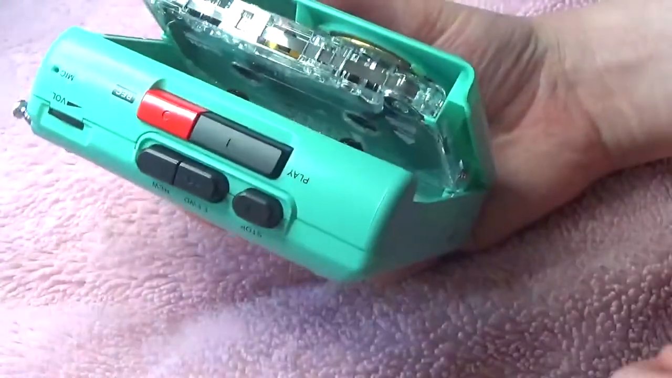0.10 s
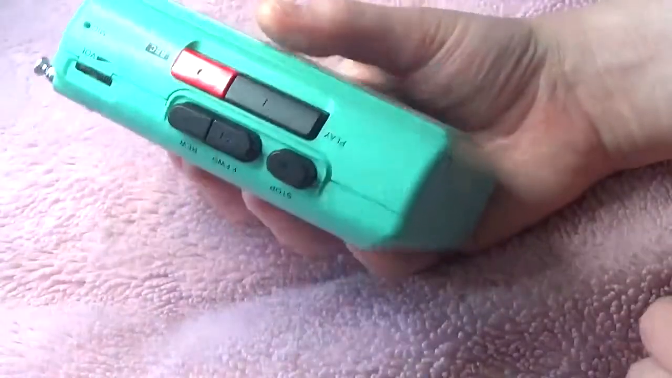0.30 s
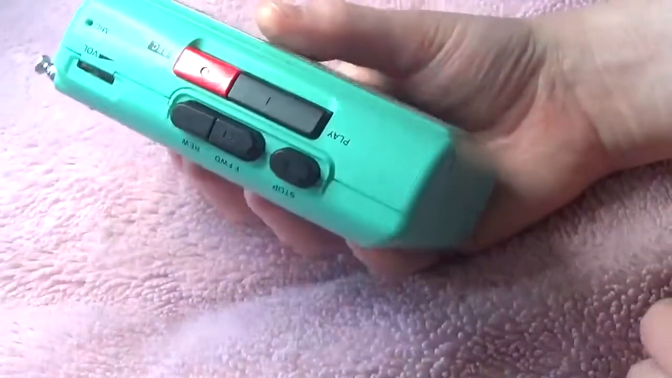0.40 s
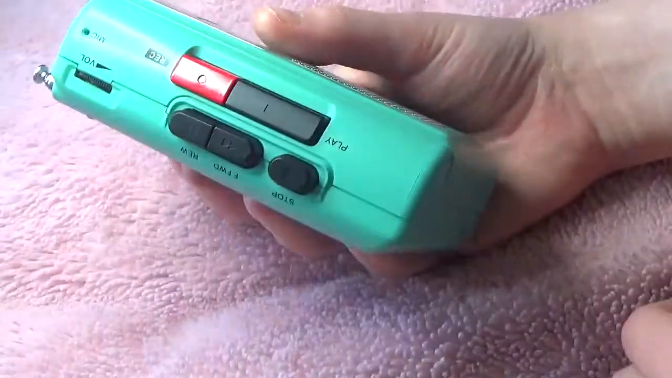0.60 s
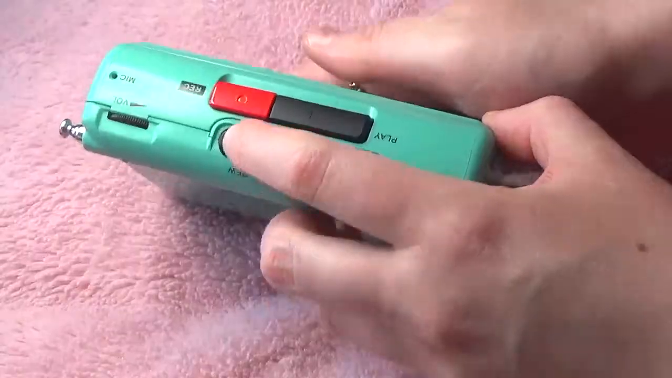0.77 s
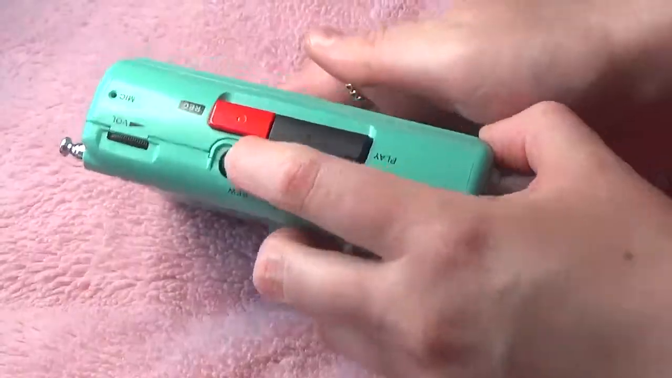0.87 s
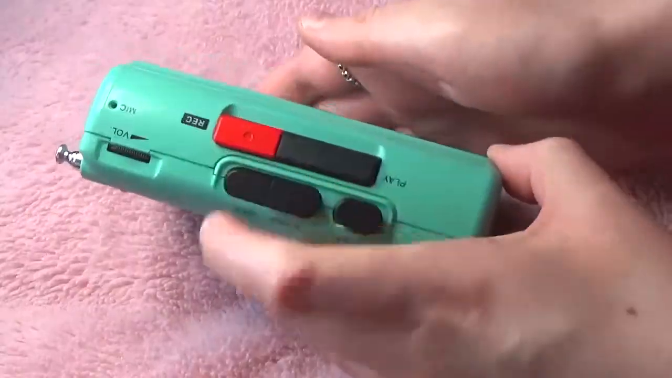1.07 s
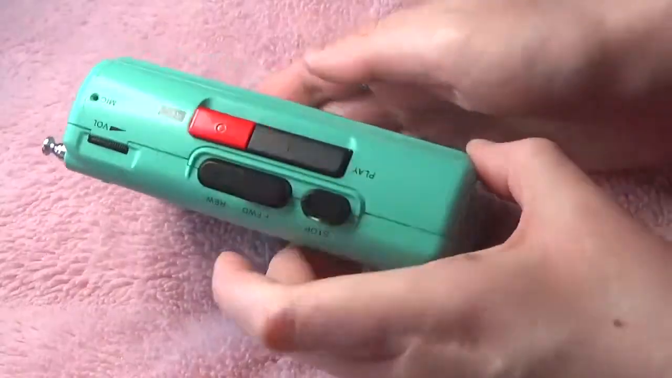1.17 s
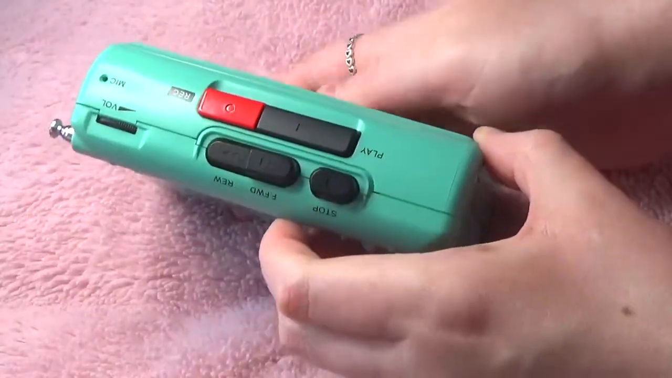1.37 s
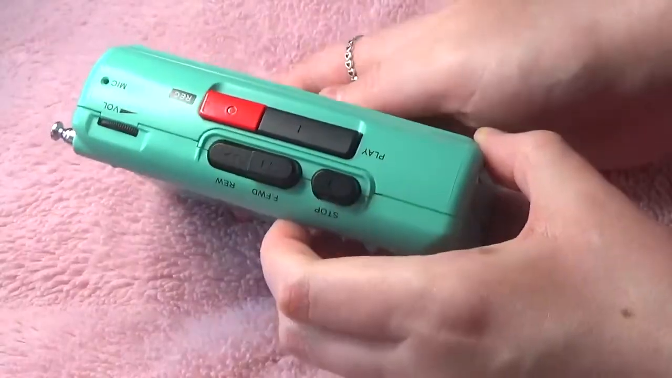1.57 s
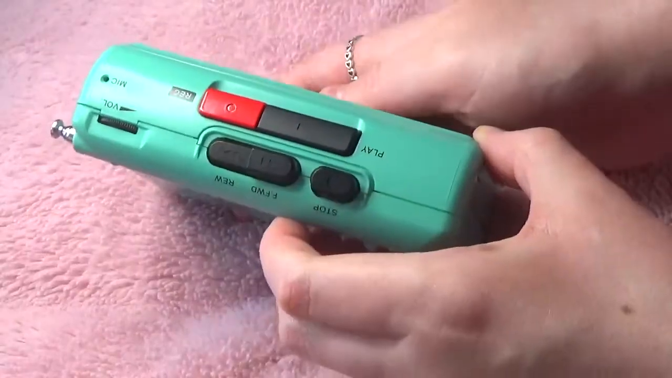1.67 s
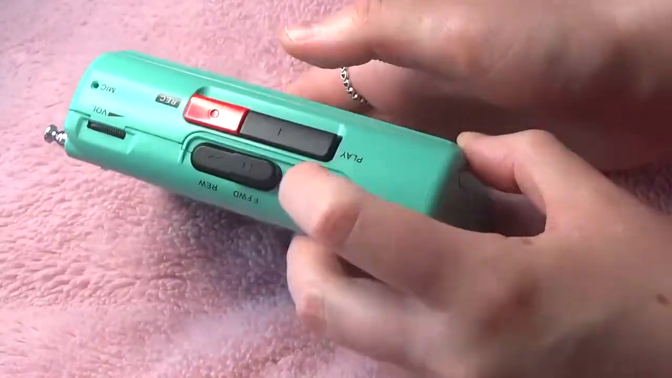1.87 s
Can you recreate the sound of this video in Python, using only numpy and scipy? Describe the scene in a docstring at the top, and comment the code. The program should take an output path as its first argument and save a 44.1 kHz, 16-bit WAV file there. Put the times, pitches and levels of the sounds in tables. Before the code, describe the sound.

A portable cassette player's plastic door claps shut, a key clicks down, then its motor whirs faintly.

```python
"""A plastic door claps shut on a tape, a key is pushed until it latches, then a small motor whirs and ticks.
This is a portable cassette player indoors, close to a stereo microphone; a faint insect trills far off.
Plastic is bursts and shoves of force ringing banks of resonances, with random grains as chatter between.
The motor is lumpy noise and gear ticks through resonances of the case, the insect is short tone pulses.
Door and key thud dully, the hand shifts on the blanket; a small soft room, hush and rumble surround it."""
import sys
import numpy as np
from scipy import signal
from scipy.fft import rfft, irfft, next_fast_len
from scipy.io import wavfile
from scipy.ndimage import map_coordinates

SR = 44100
rng = np.random.default_rng(int(sys.argv[2]) if len(sys.argv) > 2 else 0)


def volts(x):
    """Linear amplitude factor 10**(x/20) for a level x in dB, scalar or array-like."""
    e = np.asarray(x, float) / 20
    return 10 ** e


def generate_wav(signal):
    """Clip the signal to [-1, 1] and save it as 16-bit WAV at the path in sys.argv[1]."""
    frames = np.transpose(np.atleast_2d(signal))
    scaled = np.clip(frames, -1, 1) * 32767
    pcm = np.round(scaled).astype(np.int16)
    wavfile.write(sys.argv[1], SR, pcm)


N = 83790
HIT_N = SR // 50  # samples given to one contact
SHUT_S = 0.5  # from here on the case rings as a shut one


def unit(x):
    """Scale to rms 1."""
    return x / np.sqrt(np.mean(x ** 2) + 1e-20)


def along(points, hz):
    """Read (frequency [Hz], value) points on a log frequency axis."""
    f, v = np.transpose(points)
    return np.interp(np.log(hz + 1), np.log(f + 1), v)


def curve(rows):
    """Draw (time [s], value) rows as one value per sample."""
    return np.interp(np.arange(N) / SR, *np.transpose(rows))


def wobble(rate):
    """A smooth random curve with rate knots a second."""
    knots = rng.standard_normal(int(N * rate / SR) + 4)
    return map_coordinates(knots, [np.arange(N) * rate / SR])


def filtered(x, response):
    """Multiply the spectrum of x by a complex response of frequency."""
    m = next_fast_len(N + 8192)
    return irfft(rfft(x, m) * response(np.fft.rfftfreq(m, 1 / SR)), m)[..., :N]


def ringing(x, modes, swing_in=None):
    """Send x through summed resonances, scaled to keep the power of white noise."""
    def response(f):
        h = 0
        for k, (center, width, db) in enumerate(modes):
            resonance = 1j * f * width / (center * center - f * f + 1j * f * width)
            h = h + (-1) ** k * volts(db) * resonance
        if swing_in:
            # a second, wider resonance softens the start of the ring
            center, width, _ = modes[0]
            h = h * 1j * f * width / (center * center - f * f + 1j * f * width * swing_in)
        return h / np.sqrt(np.mean(abs(h) ** 2))
    return filtered(x, response)


def mode_gains(modes):
    """Share unit power among modes by width and level, with alternating signs."""
    power = np.array([width * volts(2 * db) for _, width, db in modes])
    return np.sqrt(power / power.sum()) * (-1) ** np.arange(len(modes))


def struck(modes, force):
    """Each mode is rung by its own row of force and swings up three times faster than it dies."""
    return sum(gain * ringing(row[:N], [mode], swing_in=3)
               for gain, mode, row in zip(mode_gains(modes), modes, force))


def burst(length_s):
    """A contact: a flurry of tiny impacts that rises fast and dies away."""
    rise_s = 0.0002
    t = np.arange(HIT_N) / SR
    impacts = np.sign(rng.standard_normal(HIT_N))
    return impacts * (1 - np.exp(-t / rise_s)) * np.exp(-t / length_s)


def push(length_s):
    """One smooth shove and its rebound."""
    t = np.arange(HIT_N) / SR / length_s
    return (1 - t) * np.exp(-t)


def chatter():
    """Loose parts chatter around the door and the latch: sparse random grains, one row per part."""
    # Chatter of the loose parts: (time [s], level [dB])
    chatter_level = [(.222, -65), (.228, -39), (.24, -37), (.25, -31), (.268, -24), (.276, -34),
                     (.284, -32), (.297, -25.5), (.33, -39.5), (.38, -61.5), (.42, -68), (.67, -72),
                     (.68, -54.5), (.70, -61), (.75, -52), (.77, -66.5), (.783, -32), (.795, -47),
                     (.83, -39.5), (.855, -47.5), (.88, -61), (.93, -101)]
    # Share of open case, shut case, panels, crack, thin edges: [dB]
    chatter_mix = [-10.5, -8, -10, -8.5, -10.5]
    grains_per_s = 3500
    hits = rng.random((5, N)) < grains_per_s / SR
    grains = unit(hits * rng.standard_normal((5, N)))
    grains = volts(chatter_mix)[:, None] * volts(curve(chatter_level)) * grains
    shut = np.arange(N) > SHUT_S * SR
    grains[0] *= ~shut
    grains[1] *= shut
    return grains


def plastic():
    """Each contact rings case, panels, crack and edges by where it lands; chatter fills the gaps."""
    # Contacts of plastic parts: (time [s], length [s], hollow case [dB], panels [dB], crack [dB],
    # thin edges [dB], lean of the case to its high modes [dB per octave], struck panel pitch [Hz])
    contacts = [(0.161, 0.0017, -68.5, -45.5, -73, -73, 0, 2500),
                (0.19, 0.0017, -58, -47, -57.5, -52.5, 0, 3770),
                (0.2252, 0.0021, -25, -26, -44, -44, 10, 2840),
                (0.23, 0.00128, -25.5, -50, -56, -58, 16, 2200),
                (0.2392, 0.0021, -34, -23.5, -48, -36, -3, 2900),
                (0.2435, 0.0031, -33, -22.5, -31, -23, -3, 2900),
                (0.2476, 0.0037, -19.5, -18, -23, -28, 3, 2870),
                (0.2503, 0.004, -10.5, -24, -26, -18, 9, 3360),
                (0.2538, 0.0033, -16, -18, -18.5, -15.5, 15, 3600),
                (.2572, 0.00244, -15, -23, -23, -19, 8, 3000),
                (0.2611, 0.00247, -14, -15, -25, -19.5, 18, 3150),
                (.2645, 0.0016, -7.5, -11, -27, -20, 8, 2490),
                (0.266, 0.00086, -13.5, -25, -32, -29, 11, 2300),
                (0.2753, 0.001, -29, -43, -45, -43.5, 3, 2200),
                (0.2789, 0.00218, -10.5, -14.5, -36, -23, -6.5, 2290),
                (0.2837, 0.0019, -29, -14, -17, -16, -11, 3600),
                (0.2865, 0.0032, -15, -20, -18, -19, -8, 3200),
                (0.289, 0.0033, -15.5, -16.5, -27, -30.5, -1, 3400),
                (0.2942, 0.0021, -34.5, -25, -36, -32.5, 12.5, 3850),
                (0.2978, 0.002, -22.5, -36, -40.5, -39.5, -3, 2300),
                (.6752, 0.0014, -48, -26, -35, -30.5, -1, 3960),
                (.679, 0.0022, -38, -44, -51, -54, 9, 3400),
                (0.7027, 0.0011, -53.5, -37.5, -60, -69, -4.5, 3920),
                (0.709, 0.0032, -38, -51, -56, -58, -13, 2200),
                (0.725, 0.00076, -45, -40, -60, -60, 7, 3000),
                (0.743, 0.002, -42.5, -36, -40, -39.5, -6, 3780),
                (0.746, 0.00085, -33.5, -50, -55, -58, -2, 2200),
                (0.7831, 0.00124, -34, -18, -41, -36, -8, 3930),
                (0.7864, 0.00136, -26.5, -11.5, -18, -14, 12, 3730),
                (.788, 0.00081, -15.5, -18, -9.5, -24, -1, 3300),
                (0.791, 0.00064, -54, -27, -27, -27, 7, 2300), (0.8, 0.003, -37, -31, -42, -57, 3, 3600),
                (0.803, .002, -47, -38, -40, -51, -8, 1900), (0.816, 0.0019, -41, -52, -46, -55, 0, 3600),
                (0.823, 0.002, -49.5, -30.5, -36, -55, -4, 2500),
                (0.8409, 0.00303, -42.5, -28.5, -28, -31, 0, 3600),
                (0.845, 0.0018, -48, -31, -37, -53, -7, 3700),
                (0.9619, 0.002, -69, -23.5, -49, -44, 5, 4860),
                (.9648, 0.0019, -35.5, -25.5, -38, -40.5, 23, 2340),
                (.9665, 0.0013, -42, -30, -41, -50, 21, 3960),
                (0.969, 0.0023, -36.5, -38, -47, -55, -15.5, 2150),
                (0.985, 0.0028, -47, -42, -58, -53, 9, 1960), (0.996, 0.002, -54, -42, -51, -60, 3, 4400)]
    # Modes of the hollow case, door open: (frequency [Hz], width [Hz], relative level [dB])
    open_modes = [(589, 310, -6.5), (782, 110, -20), (810, 150, -15), (1052, 222, 11.5), (1650, 130, -8.5)]
    # Modes of the case once the door is shut: (frequency [Hz], width [Hz], relative level [dB])
    shut_modes = [(639, 203, -5), (762, 110, 5.5), (1066, 148, 8), (1500, 106, 0), (1686, 88, -10)]
    # Modes of the panels: (frequency [Hz], width [Hz], relative level [dB])
    panel_modes = [(1980, 220, -1), (2250, 260, 0.5), (2533, 180, 1), (2896, 246, 2), (3300, 240, 0),
                   (3600, 130, -2), (3916, 270, -1.5), (4610, 160, -1.5)]
    # Modes of the bright crack: (frequency [Hz], width [Hz], relative level [dB])
    crack_modes = [(5210, 970, -5.5), (6190, 380, 1), (7260, 830, -2.5), (8500, 400, -2.5)]
    # Modes of the thin edges: (frequency [Hz], width [Hz], relative level [dB])
    edge_modes = [(8980, 450, -2), (10180, 410, 0.5), (10485, 290, -4), (10720, 190, -1)]
    case_push_s, spot_db_per_octave = 0.00015, 15
    open_case, shut_case, panels = [np.zeros((len(m), N + SR)) for m in (open_modes, shut_modes, panel_modes)]
    crack, edges = np.zeros((2, N + SR))
    panel_hz = np.transpose(panel_modes)[0]
    for s, length_s, case_db, panel_db, crack_db, edge_db, lean_db, spot_hz in contacts:
        i = round(s * SR)
        hit = slice(i, i + HIT_N)
        case, modes = (open_case, open_modes) if s < SHUT_S else (shut_case, shut_modes)
        lean = volts(case_db + lean_db * np.log2(np.transpose(modes)[0] / 1000))
        case[:, hit] += lean[:, None] * push(case_push_s)
        # panels far in pitch from the struck one ring less
        near = volts(panel_db - spot_db_per_octave * abs(np.log2(panel_hz / spot_hz)))
        # each panel is caught at its own random instant
        delay = rng.exponential(size=len(panel_modes)) * length_s / 2
        caught = i + (delay * SR).astype(int)
        panels[np.arange(len(panel_modes)), caught] += near * np.linalg.norm(burst(length_s))
        crack[hit] += volts(crack_db) * burst(length_s)
        edges[hit] += volts(edge_db) * burst(length_s)
    for force, rattle in zip((open_case, shut_case, panels, crack, edges), chatter()):
        force[..., :N] += rattle
    body = struck(open_modes, open_case) + struck(shut_modes, shut_case) + struck(panel_modes, panels)
    return body + ringing(crack[:N], crack_modes) + ringing(edges[:N], edge_modes)


def thuds():
    """Dull thuds of the door and the pushed key: smooth shoves ring a few low, broad modes."""
    # Shoves: (time [s], level [dB])
    shoves = [(0.251, -42), (0.289, -36.5), (0.788, -51.5), (0.83, -56)]
    # Modes of the thud: (frequency [Hz], width [Hz], relative level [dB])
    thud_modes = [(152.8, 100, -0.5), (227.7, 98, 3.5), (377, 140, 3.5)]
    force = np.zeros(N + SR)
    for s, db in shoves:
        i = round(s * SR)
        force[i:i + HIT_N] += volts(db) * push(0.0011)
    return ringing(force[:N], thud_modes)


def motor():
    """Lumpy gear noise and single tooth ticks, heard through resonances of the case."""
    # Whir before its overall gain; the first time is the start: (time [s], level [dB])
    motor_level = [(.85, -65), (.93, -62), (1.0, -61.5), (1.18, -60), (1.33, -60), (1.5, -60), (1.7, -60),
                   (1.86, -59.5), (1.9, -60)]
    # Resonances of the whir: (frequency [Hz], width [Hz], relative level [dB])
    whir_modes = [(764, 187, 0), (1050, 170, -1), (1470, 81, -15), (2150, 159, 1), (2815, 160, -6),
                  (3570, 156, 2.5), (5960, 1260, -11), (7020, 330, -11), (7950, 480, -9.5),
                  (8940, 800, -6.5), (10140, 510, -8)]
    # Ticks of the gears, before the case: (time [s], level [dB])
    gear_ticks = [(1.0834, -48), (1.1692, -46), (1.1927, -44), (1.2271, -43.5), (1.3848, -41), (1.492, -41),
                  (1.514, -47), (1.5983, -39), (1.6744, -61), (1.8093, -39), (1.8672, -44)]
    whir_db, spin_up_s, tick_s, tick_dull_db_per_khz = 3.5, 0.007, 0.0037, 6
    lumps_per_s, lumps_db, flutter_per_s, flutter_db = 100, 1, 27, 1.16
    t = np.arange(N) / SR
    on = np.clip((t - motor_level[0][0]) / spin_up_s, 0, 1)
    gears = on * volts(curve(motor_level) + whir_db + lumps_db * wobble(lumps_per_s))
    ticks = np.zeros(N + SR)
    for s, db in gear_ticks:
        i = round(s * SR)
        ticks[i:i + HIT_N] += volts(db) * burst(tick_s)
    out = np.zeros(N)
    for gain, mode in zip(mode_gains(whir_modes), whir_modes):
        # each resonance of the whir also wavers on its own
        flutter = volts(flutter_db * wobble(flutter_per_s))
        noise = gears * flutter * rng.standard_normal(N)
        # ticks weaken away from 3500 Hz
        tick_gain = volts(-tick_dull_db_per_khz * abs(mode[0] - 3500) / 1000)
        out += gain * ringing(noise + tick_gain * ticks[:N], [mode])
    return out


def at_two_ports(near):
    """The player sits near the centre, slightly out of step at the two ports: a comb-shaped side signal."""
    wide_db, port_lag_s = -15.5, 0.0004

    def response(hz):
        low_cut = 1j * hz / (hz + 150)
        return low_cut * np.sqrt(2) * np.cos(2 * np.pi * hz * port_lag_s + 1)

    side = volts(wide_db) * filtered(near, response)
    return np.array([near + side, near - side])


def room(x):
    """Small soft room: a stereo noise tail in which each frequency dies at its own speed."""
    # Decay: (frequency [Hz], time to fall 60 dB [s])
    decay = [(200, 0.39), (600, 0.24), (1100, 0.11), (2000, 0.15), (5000, 0.14), (11000, 0.059)]
    hz, t, z = signal.stft(rng.standard_normal((2, SR // 3)), SR, nperseg=256)
    fading = z * volts(-60 * t / along(decay, hz)[:, None])
    tail = signal.istft(fading, SR, nperseg=256)[1]
    tail = tail / np.linalg.norm(tail[0])
    delayed = np.pad(x, (150, 0))  # samples before the tail begins
    return signal.fftconvolve(delayed[None], tail, axes=1)[:, :N]


def bumps():
    """The hand shifts on the blanket: short low wobbles through the support."""
    # Bumps: (centre time [s], length [s], frequency [Hz], level before its wobble [dB])
    shifts = [(1.447, 0.096, 89.7, -51.5), (1.521, 0.03, 68.7, -50)]
    t, out = np.arange(N) / SR, np.zeros(N)
    for s, length_s, hz, db in shifts:
        swell = np.exp(-(2 * (t - s) / length_s) ** 2)
        tone = np.sin(2 * np.pi * hz * t + wobble(40))
        out += volts(db + 0.86 * wobble(38.9)) * swell * tone
    return out


def insect():
    """Short tone pulses at a steady rate; pitch climbs pulse by pulse and each trill swells mid-way."""
    # Trills: (centre of first pulse [s], pitch of first pulse [Hz], level before swell [dB],
    # growth along the trill [dB])
    trills = [(.002, 3060, -69.5, -2), (0.403, 3353, -67.5, 4)]
    pulses, pulse_gap_s, pulse_s = 7, 0.0335, 0.013
    swell_db, glide_hz_per_s = 7.5, 350
    t, out = np.arange(N) / SR, np.zeros(N)
    for s, hz, db, growth_db in trills:
        for k in range(pulses):
            u = np.clip((t - s - k * pulse_gap_s) / pulse_s, -0.5, 0.5)
            swell = swell_db * np.sin(np.pi * (k + 0.5) / pulses)
            pulse_db = db + swell + growth_db * k / pulses + rng.normal(0, 0.75)
            pitch = hz + glide_hz_per_s * k * pulse_gap_s
            tone = np.sin(2 * np.pi * pitch * t + rng.uniform(0, 2 * np.pi))
            out += volts(pulse_db) * np.cos(np.pi * u) * tone
    return out


def rush(spectrum):
    """Stereo noise of rms 1, with a likeness of left and right that depends on frequency."""
    # Likeness of the channels: (frequency [Hz], correlation [-1 to 1])
    alike = [(60, 1), (220, 0.81), (840, 0.012), (3120, 0.16), (11600, 0.74)]

    def response(hz):
        turn = np.arccos(np.clip(along(alike, hz), -1, 1)) / 2
        return volts(along(spectrum, hz)) * [np.cos(turn), np.sin(turn)]

    mid, side = filtered(rng.standard_normal((2, N)), response)
    return unit(np.array([mid + side, mid - side]))


def hush():
    """The hush of the room: steady shaped noise."""
    # Spectrum: (frequency [Hz], relative density [dB per Hz])
    hush_spectrum = [(120, -39), (200, -3.5), (387, -2.5), (422, -3), (2860, -11), (3450, -17.5),
                     (3690, -14.5), (10600, -25.5), (11500, -50), (15000, -82.5), (22000, -120)]
    return volts(-63.5) * rush(hush_spectrum)


def rumble():
    """Low noise that drifts in level, over a steady and still deeper one."""
    # Spectrum of the rumble: (frequency [Hz], relative density [dB per Hz])
    rumble_spectrum = [(30, -46.5), (45, 2.5), (70, -3.5), (120, 1), (150, -5), (260, -12), (340, -45),
                       (570, -120)]
    # Drift of the rumble, before a small wobble: (time [s], level [dB])
    rumble_level = [(0, -62), (.15, -65), (.4, -64.5), (.7, -65), (1, -63), (1.2, -64.5), (1.4, -63),
                    (1.65, -62.5), (1.9, -69.5)]
    # Spectrum of the deepest rumble: (frequency [Hz], relative density [dB per Hz])
    deep_spectrum = [(6, -16), (14, 1.5), (22, -12), (30, -18), (40, -54)]
    drift = volts(curve(rumble_level) + 0.84 * wobble(14.0))
    return drift * rush(rumble_spectrum) + volts(-57) * rush(deep_spectrum)


def scene():
    """The player in its room, with the hand, the insect, hush and rumble around it."""
    room_db = -16.5
    near = plastic() + thuds() + motor()
    player = at_two_ports(near) + volts(room_db) * room(near)
    return player + insect() + bumps() + hush() + rumble()


def top_cut(x):
    """Nothing passes above the cut-off."""
    return signal.sosfilt(signal.butter(12, 12240, fs=SR, output="sos"), x)


def record(dry):
    """A sharp band limit with a weak skirt above it finishes the mix."""
    top_hz, leak_db, leak_db_per_khz = 11020, -13.5, 9

    def limit(hz):
        skirt = volts(leak_db - leak_db_per_khz * (hz - top_hz) / 1000)
        return np.where(hz < top_hz, 1, skirt)

    mix = filtered(dry, limit)
    return top_cut(mix)


dry = scene()
out = record(dry)
generate_wav(out)
```